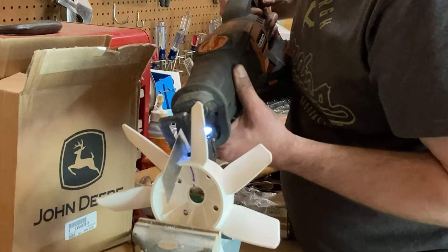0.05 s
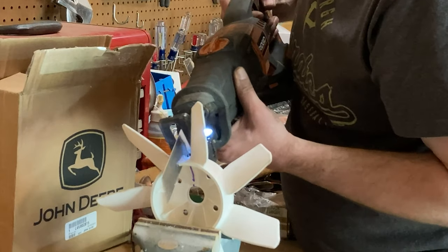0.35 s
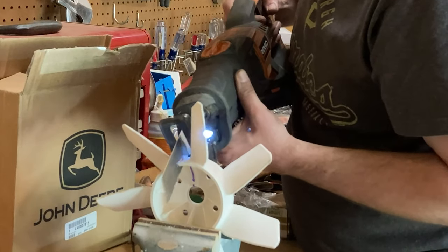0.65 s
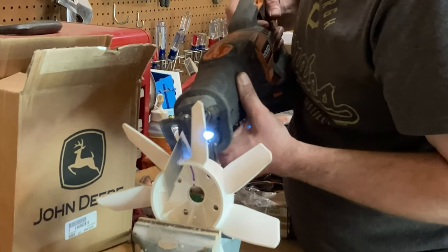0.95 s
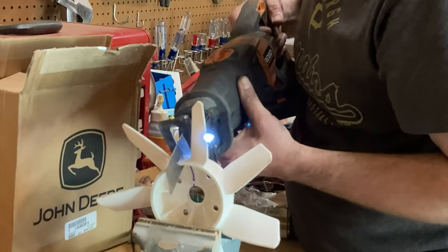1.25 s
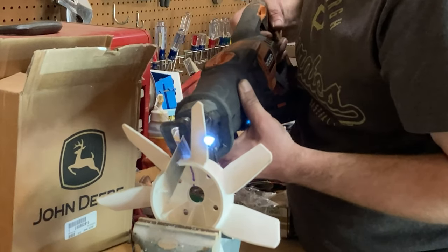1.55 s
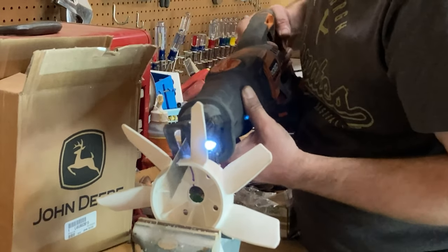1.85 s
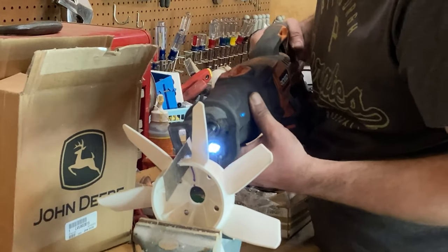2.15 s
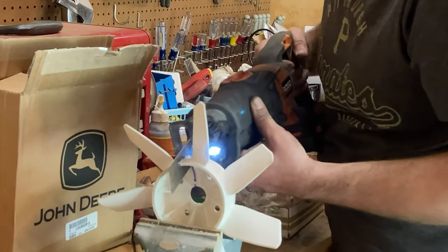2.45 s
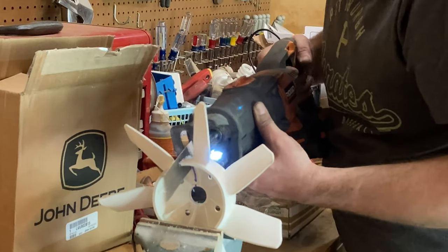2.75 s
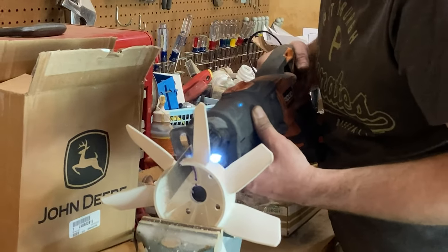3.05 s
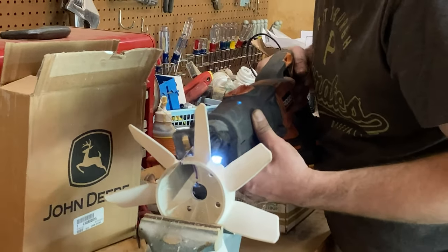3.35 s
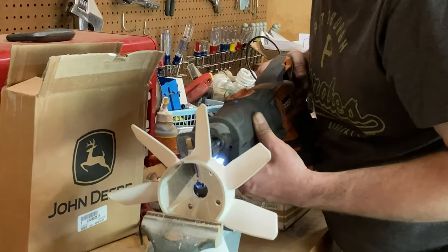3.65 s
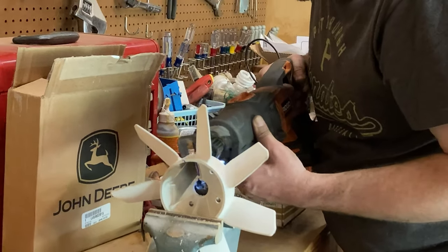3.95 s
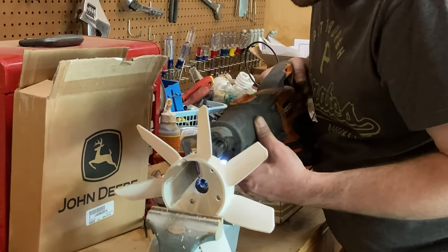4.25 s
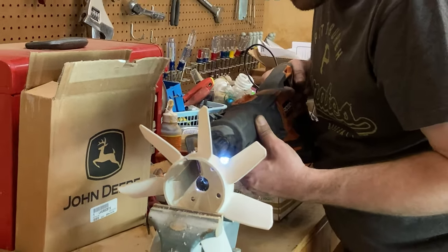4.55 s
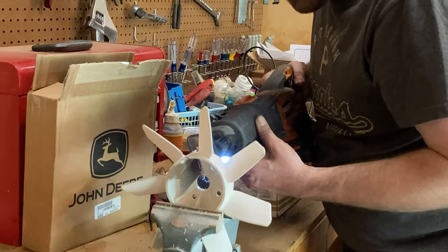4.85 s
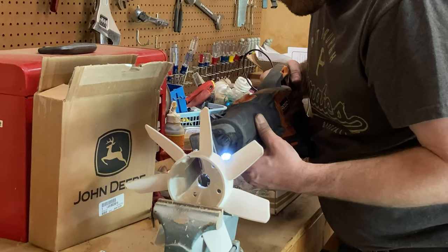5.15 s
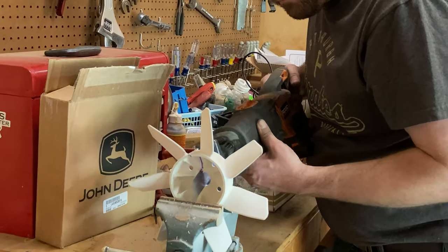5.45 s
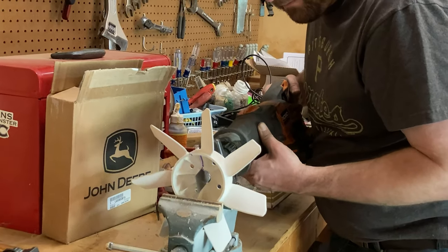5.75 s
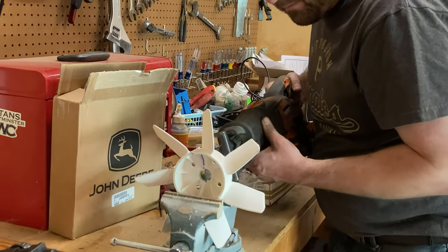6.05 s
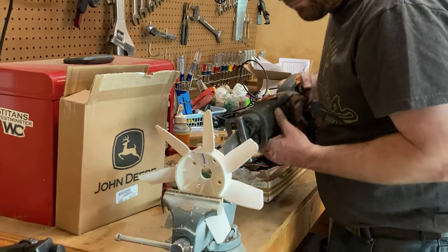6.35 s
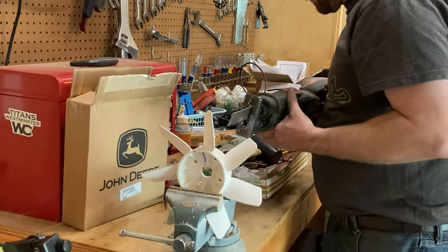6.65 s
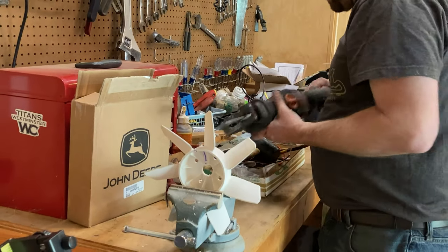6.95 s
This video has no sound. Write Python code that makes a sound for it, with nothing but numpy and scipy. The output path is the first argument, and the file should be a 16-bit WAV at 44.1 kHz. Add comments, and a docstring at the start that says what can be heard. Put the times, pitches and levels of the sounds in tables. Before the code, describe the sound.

Close up in a small workshop, a power saw clatters lightly before its steel blade grabs hard plastic. After a brief near stop, it cuts in rapid rasping strokes with crackling chips, sharp knocks and a low shudder from the bench. A few metallic pings mark the breakthrough, then the saw winds down. The blade scrapes softly out of the slot, and cloth rustles faintly.

```python
"""First one hears the gear rattle of a reciprocating saw running light in a small workshop. It bites into a
hard plastic fan held in a vise, slows almost to rest, then saws on under load. On each pull stroke the
tooth impacts force the plastic to chatter and rasp, and excite the fan's normal modes; the reciprocating
mass shakes the bench. The blade breaks through, the motor coasts down and the blade scrapes out of the
slot. A soft bump and the rustle of a sleeve follow as the saw is lifted away."""
import sys
import numpy as np
from scipy import signal
from scipy.fft import rfft, irfft, next_fast_len
from scipy.io import wavfile
from scipy.ndimage import uniform_filter1d

SR = 44100
rng = np.random.default_rng(int(sys.argv[2]) if len(sys.argv) > 2 else 0)


def waveform_to_disk(signal):
    """Save audio, clipped to [-1, 1], as 16-bit WAV at the path in sys.argv[1]."""
    frames = np.transpose(np.atleast_2d(signal))
    scaled = np.clip(frames, -1, 1) * 32767
    samples = np.round(scaled).astype(np.int16)
    wavfile.write(sys.argv[1], SR, samples)


N = 313489
TIME = np.arange(N) / SR
SIZE = next_fast_len(N + SR)
FREQS = np.maximum(np.arange(SIZE // 2 + 1) * SR / SIZE, 1)

# Levels are relative: each source applies its own gain.
# spectrum of the quiet workshop: f/Hz, level/dB
AMBIENT_COLOUR = [(20, -21.5), (50, -2.5), (120, -1), (400, -21), (1600, -30), (4500, -25), (8000, -28),
                  (15000, -39)]
# reverberant against direct sound: f/Hz, level/dB
ROOM_COLOUR = [(100, 0), (300, 1.5), (700, -4.5), (2000, -5), (4500, -5.5), (7000, -9.5), (10000, -27.5),
               (16000, -13.5)]
# lead of the left microphone port over the right: f/Hz, phase/rad
PORT_PHASE = [(0, 0), (1800, .5), (3300, 1.5), (5700, 2.6), (7100, 6.3), (9100, 9.4), (16000, 18.8)]
# left port minus right: f/Hz, level/dB
PORT_BALANCE = [(100, -2.5), (300, -1.5), (700, 4), (1400, 4.5), (3000, 3), (4200, 2), (5500, -6.5),
                (7000, 0.5), (10000, 0)]

# modes of the hollow bump: f/Hz, bandwidth/Hz, level/dB
BUMP_MODES = [(480, 43, 3.5), (647, 20, 2), (950, 45, 3.5), (1200, 70, -11)]
# envelope of the sleeve's rustle: t/s, level/dB
RUSTLE = [(6.2, -72), (6.78, -81.5), (6.92, -65.5), (6.98, -71), (7.06, -67), (7.12, -74)]
# spectrum of the rustle: f/Hz, level/dB
RUSTLE_COLOUR = [(100, 14), (400, -3), (5000, 4), (7400, 4), (11300, 6), (15000, -14)]
# envelope of the blade's scrape out of the slot: t/s, level/dB
WITHDRAWAL = [(5.88, -78), (5.99, -59.5), (6.07, -53.5), (6.12, -72), (6.2, -85)]
# spectrum of that scrape: f/Hz, level/dB
SCRAPE_COLOUR = [(300, 2), (1000, -3), (2000, -8), (3300, -4), (5000, -1.5), (8000, -1), (11000, -4),
                 (15500, -19)]
# low mode of the fan's blades after the cut: f/Hz, bandwidth/Hz, level/dB
CUT_FAN_MODE = [(259.4, 30, -1.5)]

# crank speed set by the trigger, one stroke out and back a turn: t/s, stroke rate/Hz
SPEED = [(0, 20.07), (.618, 20.07), (.875, 24.6), (1.3, 24.18), (1.778, 24.04), (2.068, 1.87), (2.28, 1.69),
         (2.384, 12), (2.63, 12.86), (2.765, 10.45), (3.089, 13.14), (3.899, 14.84), (4.258, 14.99),
         (4.534, 17.62), (4.8, 6.23), (5.082, 18.21), (5.484, 16.9), (5.709, 6.11), (5.85, 0)]
# spectral envelope of the shaking's harmonics: f/Hz, level/dB
SHAKE_COLOUR = [(25, -44.5), (48, -21), (60, -13.5), (78, -15.5), (94, -4), (100, 3), (121, -18),
                (135, -14), (146, 1), (158, -10.5), (171, -2.5), (182, -7.5), (200, -11.5), (245, -20),
                (290, -2), (340, -11.5)]
# coupling of the saw's shoe to vise and bench: t/s, level/dB
BRACING = [(.7, 1), (.95, 2), (1.6, 4.5), (1.8, 0.5), (1.97, -1.5), (2.12, 11.5), (2.38, -3.5), (2.5, 3),
           (2.8, 6.5), (3.6, -2), (4.25, -0.5), (4.5, -7.5), (4.9, -4), (5.5, -1)]
# whine of the drive as it picks up again: t/s, f/Hz, level/dB
WHINE = [(2.255, 5800, -64.5), (2.29, 5770, -57), (2.328, 5000, -43.5), (2.345, 4830, -61.5)]
# resonances of the saw's housing: f/Hz, bandwidth/Hz, lift/dB
HOUSING_RESONANCES = [(746, 52, 6), (1126, 56, 5.5), (1800, 40, 1.5), (2780, 110, 0.5), (4760, 130, 5),
                      (6090, 300, 8.5), (7700, 370, 2)]
# spectrum of sliding friction: f/Hz, level/dB
FRICTION_COLOUR = [(2000, -13), (4500, -2.5), (6500, -8.5), (8500, 4), (9500, 0), (10700, 5), (12300, -6.5),
                   (15500, -9.5)]
# modes of the slider's clack: f/Hz, bandwidth/Hz, level/dB
CLACK_MODES = [(1200, 220, -5.5), (2520, 200, -4.5), (2753, 80, 1.5), (3300, 380, -5)]
# clacking allowed by the slider's play: t/s, level/dB
SLIDER_PLAY = [(1.4, -8), (2.5, -5), (5, -10)]
# slams of the slider into the end of its play: t/s, level/dB
HARD_CLACKS = [(0.033, -19), (0.481, -18), (1.019, -22), (1.099, -22.5), (1.14, -18.5), (4.79, -26.5),
               (4.861, -30)]
# spectrum of the gear rattle: f/Hz, level/dB
GEAR_COLOUR = [(100, -38.5), (250, -8), (500, -1.5), (750, -1.5), (1200, -1.5), (2000, -6), (2900, -7.5),
               (4100, -7), (4700, -8.5), (6500, -12.5), (10000, -31), (16000, -38)]
# the loose saw rattles more until the blade settles into its groove: t/s, level/dB
LOOSENESS = [(.3, 4), (1.4, 1), (1.85, -2), (2.0, -7.5), (2.5, 0.5), (5.2, -1)]

# cracks, bumps and ticks: t/s, level/dB, f/Hz, decay time/s
KNOCKS = [(1.933, -45, 10000, 0.0025), (2.304, -48, 2460, 0.0072), (2.359, -41, 2400, 0.005),
          (2.4, -34.5, 2460, .008), (3.768, -21, 1110, 0.0054), (3.836, -22.5, 1610, 0.0098),
          (4.223, -15.5, 810, 0.0058), (4.306, -9, 910, 0.0096), (5.396, -16.5, 3600, 0.0064),
          (6.05, -48.5, 7020, 0.0063), (6.5235, -42.5, 9470, 0.0044), (6.692, -64.5, 8010, .006)]
# modes of the steel blade: f/Hz, bandwidth/Hz, level/dB
STEEL_MODES = [(2990, 58, 1), (4000, 280, -9.5), (5280, 400, -7), (7260, 780, -13.5), (8085, 300, -8.5)]
# the steel blade snaps free of the slot: t/s, level/dB
PINGS = [(3.332, -20.5), (3.532, -16.5), (3.602, -16), (5.4, -16.5), (5.457, -22.5), (5.519, -25)]
# mode of the fan's rim: f/Hz, bandwidth/Hz, level/dB
RIM_MODE = [(734, 44, 0.0039)]
# flicks on the rim: t/s, level/dB
RIM_FLICKS = [(4.613, -15), (4.992, -15.5), (5.118, -18)]
# chips break off the cut: t/s, level/dB
CHIP_SNAPS = [(2.623, -18), (2.741, -31), (2.876, -13.5), (2.932, -25.5), (3.012, -20), (3.164, -21.5),
              (3.238, -24.5), (3.312, -21), (3.341, -23), (5.006, -27.5), (5.331, -32)]
# modes of the fan's hub: f/Hz, bandwidth/Hz, level/dB
HUB_MODES = [(363.5, 12, 6.5), (399, 10, -0.5), (473.4, 20, -1.5), (467, 10, -3.5), (499, 13, -6.5),
             (619, 33, -5)]
# the fan's blades sound lower as the cut weakens the hub: t/s, f/Hz
FAN_BLADE_PITCH = [(1.8, 314), (2.6, 295), (3.1, 280), (3.6, 277), (4.1, 278), (4.5, 270), (5.2, 268)]
# modes reached as the slot lengthens: t/s, favoured hub f/Hz, blades level/dB, hub level/dB, rim level/dB
FAN_EXCITATION = [(1.5, 530, -43, -32, -52), (1.7, 540, -21.5, -23, -41.5), (1.92, 500, -33, -30, -47.5),
                  (2.15, 480, -65.5, -55, -76), (2.33, 450, -68.5, -68, -78),
                  (2.43, 450, -43.5, -47, -55.5), (2.46, 458, -22, -27, -37), (2.601, 410, -28, -26.5, -33),
                  (2.9, 415, -25.5, -24.5, -36.5), (3.5, 394, -20, -25.5, -43),
                  (3.95, 494, -23.5, -26, -35.5), (4.22, 510, -24, -18, -33), (4.33, 477, -24.5, -27, -24),
                  (4.47, 478, -41, -31.5, -38.5), (4.54, 478, -25, -30, -36), (4.6, 476, -38, -34.5, -29.5),
                  (4.7, 478, -30.5, -26, -32.5), (4.77, 474, -40.5, -42, -42.5),
                  (4.86, 474, -32.5, -38, -38), (4.931, 475, -29, -24.5, -43), (5.0, 478, -45, -33.5, -28),
                  (5.15, 475, -35, -45.5, -40), (5.32, 432, -44.5, -32.5, -41.5),
                  (5.58, 474, -43, -52.5, -34.5), (5.66, 475, -66, -72, -72)]
# upper resonances of the fan: f/Hz, bandwidth/Hz, lift/dB
FAN_RESONANCES = [(740, 58, 1.3), (1073, 61, 4), (1338, 88, 8.9), (1730, 140, 4.3), (2868, 34, 5),
                  (4680, 240, 7.3)]

# how hard the blade is pressed into the plastic: t/s, level/dB
FEED = [(1.25, -18), (1.519, -4.5), (1.629, 8.5), (1.82, 2.5), (1.929, -7), (2.37, -16), (2.75, 0),
        (3.35, -1.5), (3.83, 3.5), (4.2, -1), (4.43, -6), (4.6, -9.5), (4.8, -15), (4.95, -0.5),
        (5.16, -12.5), (5.511, -21), (5.6, -23.5)]
# strokes on which the teeth snag: t/s, extra force/dB, extra chip level/dB
SNAGS = [(2.455, 11, 8.5), (2.612, 1, 1.5), (2.878, 0.5, 1), (4.308, 6.5, 3), (4.922, 3.5, 5),
         (5.404, 10, 12.5), (5.456, -5, 14.5), (5.518, 10, 13.5)]
# bites are drawn out early in the main cut, short midway, longest near the end: t/s, length factor
BITE_LENGTH = [(1.8, 0.94), (2.6, 1.35), (3.5, 1.3), (3.72, 0.75), (4.5, 1), (5, 2.2)]
# the blade binds and catches on the return strokes: t/s, level/dB
BINDING = [(2.55, -33.5), (2.94, -34), (3.08, -24), (3.33, -35), (3.47, -21), (3.6, -24), (3.721, -43.5)]
# spectrum of the plastic's chatter: f/Hz, level/dB
CHATTER_COLOUR = [(150, -21.5), (450, -2.5), (650, -6.5), (800, -1.5), (1100, -2.5), (1400, -4.5),
                  (2000, 0.5), (3000, -5), (8000, -47.5)]
# spectrum of the teeth's rasp: f/Hz, level/dB
RASP_COLOUR = [(800, -35.5), (2000, 2), (2900, 1.5), (3500, 1), (4200, -9.5), (4800, -6.5), (9000, -26.5)]
# spectrum of the chips' crackle: f/Hz, level/dB
CHIP_COLOUR = [(2500, -18.5), (4800, 3), (6000, 1.5), (7500, -3), (9500, 4), (10700, 5.5), (12300, -5),
               (15500, -15)]

ROOM_T60_S, BREAKTHROUGH_S = 0.46, 5.503
FULL_SPEED_HZ, SKID_SPEED_HZ = 24, 7.2


def amp(db):
    """Amplitude ratio of a level in decibels."""
    return 10 ** (np.asarray(db) / 20)


def rms_one(x):
    """Normalisation to unit mean power."""
    return x / np.sqrt(np.mean(np.abs(x) ** 2) + 1e-20)


def at_time(curve, times=TIME):
    """Linear interpolation of a curve in time."""
    return np.interp(times, *np.transpose(curve))


def gains(rows):
    """Gated envelopes: one gain per dB column, open from 30 ms before the first row until the last."""
    s, *columns = np.transpose(rows)
    gate = (TIME >= s[0] - .03) * (TIME <= s[-1])
    return [amp(np.interp(TIME, s, db)) * gate for db in columns]


def at_hz(points, hz):
    """Interpolation of a spectrum in log frequency."""
    f, value = np.transpose(points)
    return np.interp(np.log(hz), np.log(f), value)


def filtered(x, response):
    """Convolution, as a product of spectra."""
    return irfft(rfft(x, SIZE) * response, SIZE)[..., :N]


def body(x, colour, resonances=()):
    """Minimum-phase filter with a broad colour and narrow resonances; white input keeps its power."""
    peaks_db = sum(lift / (1 + (2 * (FREQS - hz) / width) ** 2) for hz, width, lift in resonances)
    cepstrum = irfft(np.log(amp(at_hz(colour, FREQS) + peaks_db)), SIZE)
    return filtered(x, rms_one(np.exp(rfft(2 * cepstrum[:SIZE // 2], SIZE))))


def ring(x, modes):
    """Modal superposition: damped resonators in parallel, alternating in sign."""
    out = 0
    for k, (hz, width, db) in enumerate(modes):
        mode = signal.lfilter(*signal.iirpeak(hz, hz / width, fs=SR), x + 1e-18)
        out = out + (-1) ** k * amp(db) * mode * np.sqrt(SR / (np.pi * width))
    return out


def gliding_ring(x, hz, width_hz):
    """A damped resonator whose natural frequency varies in time."""
    spin = np.exp(2j * np.pi * np.cumsum(hz) / SR)
    return np.real(spin * signal.lfilter([1], [1, -np.exp(-np.pi * width_hz / SR)], x / spin))


def grains(per_s, spread_db):
    """Shot noise: random clicks of uneven size, at unit power."""
    clicks = (rng.random(N) < per_s / SR) * rng.choice([-1, 1], N)
    return rms_one(clicks * amp(spread_db * np.clip(rng.standard_normal(N), -2, 2)))


def crossings(position):
    """Impulse train: a click at each whole number passed, weaker as the clicks crowd together."""
    step = np.abs(np.gradient(position))
    return (np.diff(np.floor(position), prepend=np.floor(position[0])) != 0) / np.sqrt(step + 0.0013)


def wander(per_s):
    """Random modulation of spread about 1, interpolated between Gaussian values."""
    knots = rng.standard_normal(SR // 2)
    return np.interp(TIME * per_s, np.arange(len(knots)), knots)


def lobe(turn, at, width):
    """Periodic modulation: one smooth bump a turn; place and width in turns."""
    return np.exp((np.cos(2 * np.pi * (turn - at)) - 1) / (2 * np.pi * width) ** 2)


def bursts(clock, times, levels_db, rise, fall):
    """Exponential growth and decay around each event; rise and fall in the clock's units."""
    out = np.zeros(N)
    for s, db, up, down in np.broadcast(times, levels_db, rise, fall):
        at = int(s * SR)
        near = slice(max(at - SR // 20, 0), at + SR // 10)
        since = clock[near] - clock[at]
        out[near] += amp(db) * np.exp(-np.maximum(-since / up, since / down))
    return out


def ambience():
    """Stationary noise: the faint, low background of the workshop."""
    return amp(-72.5) * body(rng.standard_normal(N), AMBIENT_COLOUR)


def reverberation(x):
    """A diffuse field decays exponentially, coherent at the two ports in the bass but not the treble."""
    tail = rng.standard_normal((2, SR)) * amp(-60 * TIME[:SR] / ROOM_T60_S) * (TIME[:SR] > .003)
    mid, side = rms_one(rfft(tail, SIZE))
    coherence = 1 / (1 + (FREQS / 600) ** 2)
    pair = (np.sqrt(1 + coherence) * mid + np.sqrt(1 - coherence) * side * [[1], [-1]]) / np.sqrt(2)
    return filtered(x, pair * amp(at_hz(ROOM_COLOUR, FREQS)))


def direct_sound(x):
    """The direct wave reaches the two microphone ports with a difference of phase and level."""
    half = np.array([[.5], [-.5]])
    phase = np.interp(FREQS, *np.transpose(PORT_PHASE))
    return filtered(x, amp(half * at_hz(PORT_BALANCE, FREQS)) * np.exp(1j * half * phase))


def handling():
    """A soft impact excites hollow modes as the saw is lifted; friction makes a sleeve rustle."""
    impact = bursts(TIME, [6.405], [-57], rise=0.0037, fall=0.01) * rng.standard_normal(N)
    level, = gains(RUSTLE)
    rubbing = level * amp(2 * wander(per_s=74)) * grains(per_s=6000, spread_db=2)
    return ring(impact, BUMP_MODES) + body(rubbing, RUSTLE_COLOUR)


def withdrawal():
    """Stick-slip friction: the stopped blade scrapes out, the steel rings and the fan hums faintly."""
    level, = gains(WITHDRAWAL)
    slips = level * amp(2.5 * wander(per_s=70)) * grains(per_s=5000, spread_db=5)
    scrape = body(slips, SCRAPE_COLOUR, resonances=[(3100, 150, 5.4), (3520, 220, 12.5)])
    return amp(5.5) * scrape + amp(-4.5) * ring(slips, CUT_FAN_MODE)


def running(speed, full_db, db_per_decade, fade_db_per_s, lag_s=0.027):
    """Power law: a part's amplitude follows the speed a moment late, and fades after the breakthrough."""
    late = np.interp(TIME - lag_s, TIME, speed)
    fade_db = fade_db_per_s * np.maximum(TIME - BREAKTHROUGH_S, 0)
    return amp(full_db + db_per_decade * np.log10(late / FULL_SPEED_HZ + 1e-4) - fade_db)


def shaking(turn, speed):
    """Forced vibration: the moving mass shakes saw and bench at stroke harmonics, over a faint rumble."""
    level = running(speed, full_db=-37.5, db_per_decade=14, fade_db_per_s=34, lag_s=.07)
    stroke_hz = np.maximum(speed, 1)
    harmonics = sum(amp(at_hz(SHAKE_COLOUR, k * stroke_hz)) * np.sin(2 * np.pi * (k * turn + rng.random()))
                    for k in range(2, 15))
    rumble_colour = [(30, -35), (60, -6), (110, 0), (220, 0), (400, -25), (2000, -70)]
    rumble = amp(-10) * body(rng.standard_normal(N), rumble_colour)
    return amp(at_time(BRACING)) * level * (harmonics + rumble)


def whine():
    """The drive's thin gliding tone and its octave, roughened by frequency and amplitude modulation."""
    s, hz, db = np.transpose(WHINE)
    pitch = np.interp(TIME, s, hz) * (1 + 0.013 * wander(per_s=700))
    phase = 2 * np.pi * np.cumsum(pitch) / SR
    level, = gains(np.transpose([s, db]))
    return level * amp(3.4 * wander(per_s=140)) * (np.sin(phase) + 0.83 * np.sin(2 * phase))


def friction(turn, speed):
    """Sliding friction: the blade's flanks rub in the slot, out and back."""
    level = running(speed, full_db=-32.5, db_per_decade=53, fade_db_per_s=217)
    sliding = 0.69 + 0.64 * lobe(turn, at=.01, width=0.056) + 0.96 * lobe(turn, at=-0.46, width=0.11)
    return body(level * sliding * grains(per_s=10000, spread_db=7.5), FRICTION_COLOUR, HOUSING_RESONANCES)


def clacks(turn, level):
    """Backlash: the slider hits one end of its play hard, the other softly, and rattles after each hit."""
    hits = (crossings(turn + .105) + .3 * crossings(turn - .41)) * amp(2.3 * wander(per_s=18))
    bounce_samples = 0.0039 * SR
    dying = signal.lfilter([1], [1, -np.exp(-1 / bounce_samples)], hits + 1e-18)
    rattle = grains(per_s=6000, spread_db=5)
    impacts = .85 * hits + .6 * rattle * dying / np.sqrt(bounce_samples / 2)
    slams = bursts(TIME, *np.transpose(HARD_CLACKS), rise=.0005, fall=.002)
    return ring(level * amp(at_time(SLIDER_PLAY)) * impacts + slams * rattle, CLACK_MODES)


def gearbox(turn, speed):
    """Impact noise: worn gear teeth repeat their pattern each turn, amid loose parts and slider clacks."""
    level = amp(at_time(LOOSENESS)) * running(speed, full_db=-27, db_per_decade=25.8, fade_db_per_s=82)
    tooth_count = 53
    wear = rms_one(rng.standard_normal(tooth_count))
    mesh = crossings(turn * tooth_count) * wear[np.floor(turn * tooth_count).astype(int) % tooth_count]
    load = 0.56 + 0.5 * lobe(turn, at=0.0047, width=0.088) + 0.53 * lobe(turn, at=-0.37, width=0.027)
    impacts = 0.43 * mesh + 0.68 * grains(per_s=5000, spread_db=4.5)
    return amp(2.13) * body(level * load * impacts, GEAR_COLOUR, HOUSING_RESONANCES) + clacks(turn, level)


def knocks():
    """Band-limited transients: short cracks and bumps, each around its own pitch."""
    out, noise = np.zeros(N), rng.standard_normal(N)
    for s, db, hz, decay in KNOCKS:
        low, high = .6 * hz, min(1.6 * hz, .45 * SR)
        band = signal.butter(2, [low, high], "band", fs=SR, output="sos")
        burst = bursts(TIME, [s], [db], rise=0.00083, fall=decay) * noise
        out += signal.sosfilt(band, burst + 1e-18) * np.sqrt(SR / 2 / (high - low))
    return amp(1.5) * out


def pings():
    """Free vibration: the steel blade rings after a short scrape, the fan's rim after a flick."""
    scrapes = bursts(TIME, *np.transpose(PINGS), rise=0.00033, fall=0.0029) * rng.standard_normal(N)
    s, db = np.transpose(RIM_FLICKS)
    flicks = np.zeros(N)
    flicks[(s * SR).astype(int)] = amp(db)
    return ring(scrapes, STEEL_MODES) + amp(15) * ring(flicks, RIM_MODE)


def chip_snaps():
    """Brittle fracture: a chip breaks off with a bright snap and a little rasp."""
    snaps = bursts(TIME, *np.transpose(CHIP_SNAPS), rise=0.00027, fall=0.0018) * rng.standard_normal(N)
    return body(snaps, CHIP_COLOUR) + amp(-3.5) * body(snaps, RASP_COLOUR)


def teeth(turn):
    """Simple harmonic motion: the teeth strike the cut fastest in mid-stroke, among crumbling chips."""
    travel = 7.5 * np.sin(2 * np.pi * turn) + .2 * wander(per_s=400)  # in tooth spacings
    strikes = crossings(travel) * amp(7.0 * wander(per_s=1100))
    return 0.62 * strikes + 0.57 * grains(per_s=3500, spread_db=0.5)


def fan(turn, strikes):
    """Resonance: the teeth pluck the low modes of blades, hub and rim, which swell after each bite."""
    s, favoured_hz, *levels_db = np.transpose(FAN_EXCITATION)
    favoured = np.interp(TIME, s, favoured_hz)
    pluck = strikes * (0.17 + lobe(turn, at=0.086, width=0.088))
    blades = gliding_ring(pluck, at_time(FAN_BLADE_PITCH), width_hz=11)
    hub = sum(ring(pluck, [(hz, width, db)]) / (1 + (np.log(hz / favoured) / 0.13) ** 2)
              for hz, width, db in HUB_MODES)
    rim = ring(pluck, RIM_MODE)
    swells = (.9 + .3 * lobe(turn, at=.12, width=.08) - .4 * lobe(turn, at=-.12, width=.08),
              0.6 + lobe(turn, at=0.23, width=0.12) - 0.77 * lobe(turn, at=-0.3, width=0.2),
              0.21 + 0.87 * lobe(turn, at=0.046, width=0.1))
    out = 0
    for ringing, level, swell in zip((blades, hub, rim), gains(np.transpose([s, *levels_db])), swells):
        local_rms = np.sqrt(uniform_filter1d(ringing ** 2, size=SR // 30) + 1e-12)
        out = out + level * swell * ringing / local_rms
    return amp(-3.5) * out


def each_stroke(turn, curve, at):
    """Sampling once a turn: the times the crank passes one phase while a curve lasts, and its values."""
    s, db = np.transpose(curve)
    times = np.interp(np.arange(int(turn[-1])) + at, turn, TIME)
    times = times[(times >= s[0]) & (times <= s[-1])]
    return times, np.interp(times, s, db)


def pull_strokes(turn, speed):
    """Cutting force follows the feed fully, chip noise in part; a slow blade skids, a snag adds a jolt."""
    times, feed_db = each_stroke(turn, FEED, at=0)
    stroke_hz = np.interp(times, TIME, speed)
    grip_db = -20 * np.log10(1 + (SKID_SPEED_HZ / (stroke_hz + 1e-3)) ** 4)
    force_db = feed_db + grip_db + .5 * np.interp(times, TIME, wander(per_s=36))
    chip_db = -22.5 + 0.66 * feed_db + grip_db + .5 * np.interp(times, TIME, wander(per_s=55))
    for s, extra_force_db, extra_chip_db in SNAGS:
        stroke = np.argmin(np.abs(times - s))
        force_db[stroke] += extra_force_db
        chip_db[stroke] += extra_chip_db
    return times, force_db, chip_db


def bite(turn, times, levels_db, skid_db, fall):
    """Envelope of a quiet skid and a sharp grab; a longer grab spreads the same energy."""
    length = at_time(BITE_LENGTH, times)
    grab = bursts(turn, times - .001, levels_db - 10 * np.log10(length), .035 * length, fall * length)
    return grab + bursts(turn, times, levels_db + skid_db, rise=0.28, fall=0.2)


def flexing(x, colour, resonances):
    """Frequency modulation: a body's resonances drift by a few per cent as it flexes."""
    samples, clock = np.arange(N), np.cumsum(1 + .035 * wander(per_s=11))
    warped = np.interp(samples, clock, x)
    return np.interp(clock, samples, body(warped, colour, resonances))


def cutting(turn, speed, strikes):
    """Source and filter: tooth impacts drive chatter, rasp and crackle; return catches ring the steel."""
    times, force_db, chip_db = pull_strokes(turn, speed)
    chatter_db = force_db - 21
    catches = bursts(TIME, *each_stroke(turn, BINDING, at=.6), rise=0.0023, fall=0.004)
    chattering = bite(turn, times, chatter_db, skid_db=-2, fall=0.14) + .5 * catches
    rasping = bite(turn, times, (chatter_db + chip_db) / 2, skid_db=-3.5, fall=0.067) + 1.2 * catches
    chipping = bite(turn, times, chip_db, skid_db=-14.5, fall=0.078) + 1.2 * catches
    chatter = flexing(strikes * chattering, CHATTER_COLOUR, FAN_RESONANCES)
    rasp = body(strikes * rasping, RASP_COLOUR, FAN_RESONANCES)
    chips = body(chipping * (.5 * strikes + grains(per_s=6100, spread_db=7.5)), CHIP_COLOUR)
    steel = ring(strikes * catches, STEEL_MODES)
    return chatter + rasp + amp(-0.5) * chips + amp(-6) * steel


def scene():
    """Superposition of direct and reverberant sound; the crank's phase keeps saw and cut in step."""
    speed = at_time(SPEED)
    turn = -.75 + np.cumsum(speed) / SR  # crank angle in turns
    strikes = teeth(turn)
    saw = gearbox(turn, speed) + friction(turn, speed) + whine()
    shake = shaking(turn, speed)
    cut = cutting(turn, speed, strikes) + fan(turn, strikes) + chip_snaps() + knocks() + pings()
    sound = saw + cut + ambience()
    handled = withdrawal() + handling()
    into_room = sound + amp(-7) * shake + amp(-2) * handled
    return direct_sound(sound + shake + handled) + reverberation(into_room)


def record(dry):
    """Soft saturation rounds the peaks; band limiting cuts below 42 Hz and above 16 kHz."""
    low_cut = signal.sosfilt(signal.butter(4, 42, "high", fs=SR, output="sos"), np.tanh(dry))
    return filtered(low_cut, 1 / np.sqrt(1 + (FREQS / 16000) ** 160))


dry = scene()
out = record(dry)
waveform_to_disk(out)
```